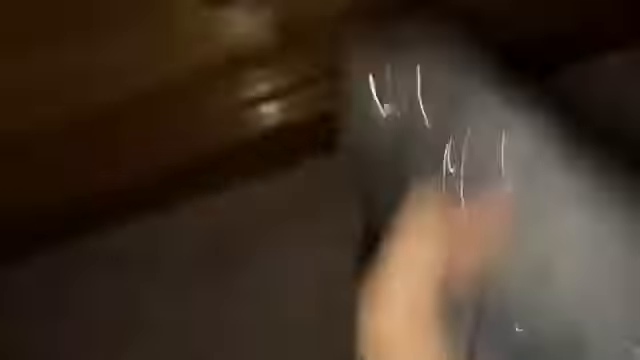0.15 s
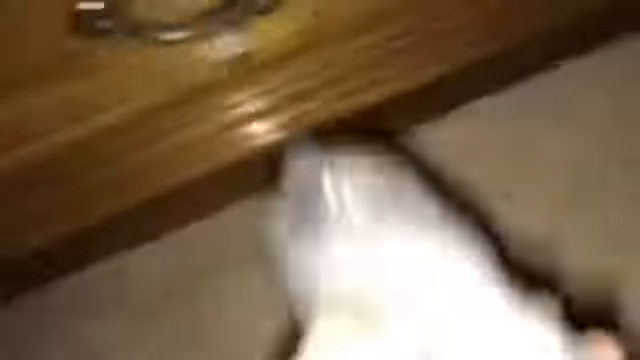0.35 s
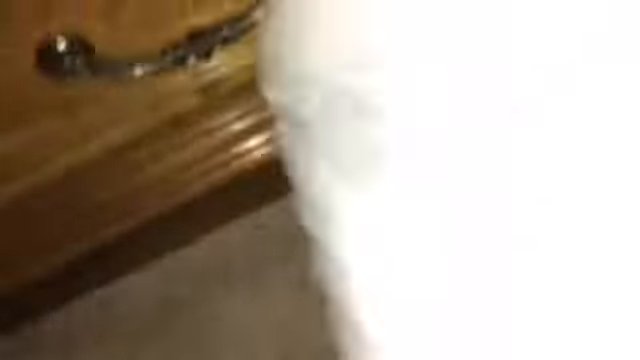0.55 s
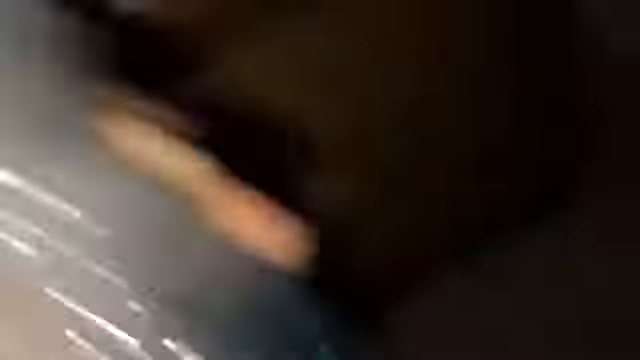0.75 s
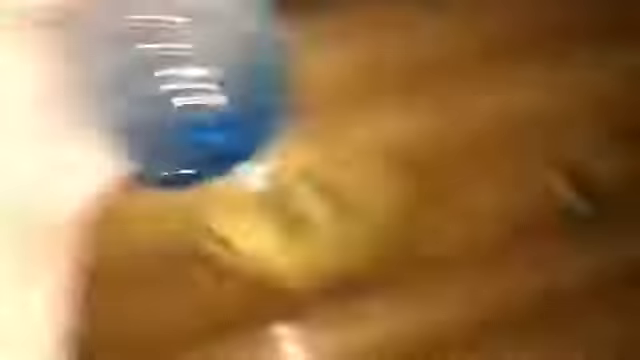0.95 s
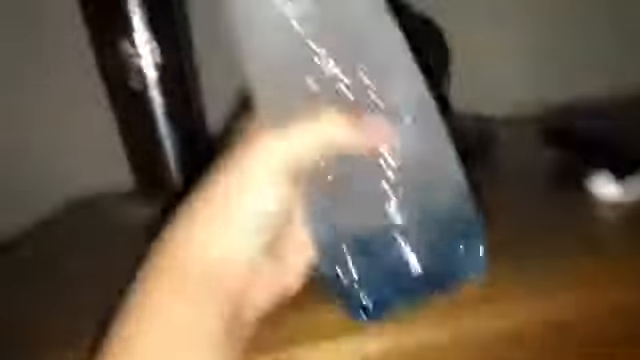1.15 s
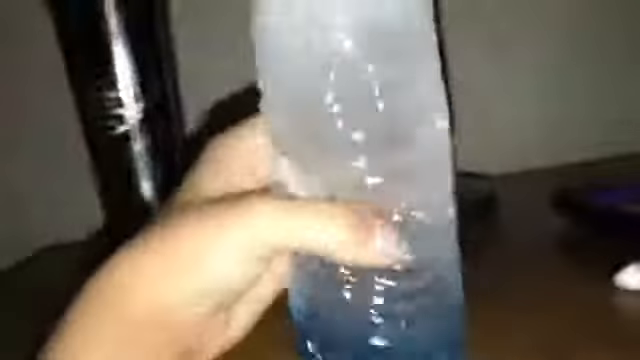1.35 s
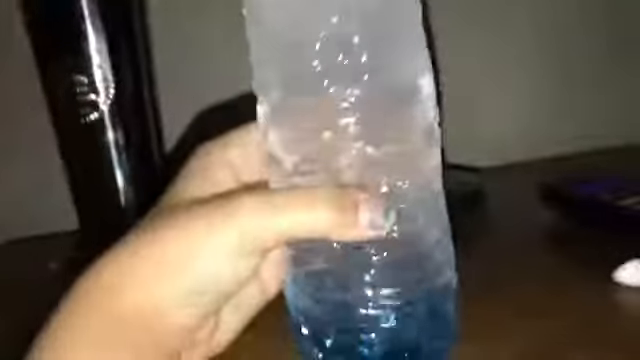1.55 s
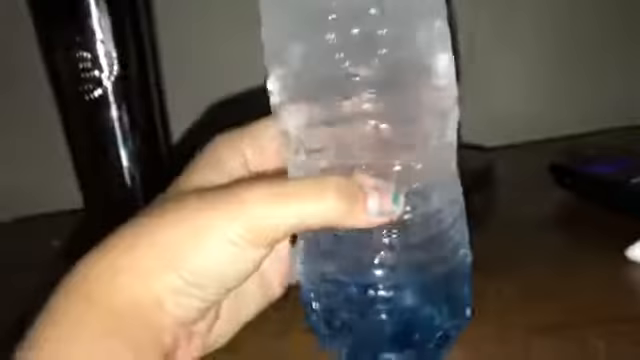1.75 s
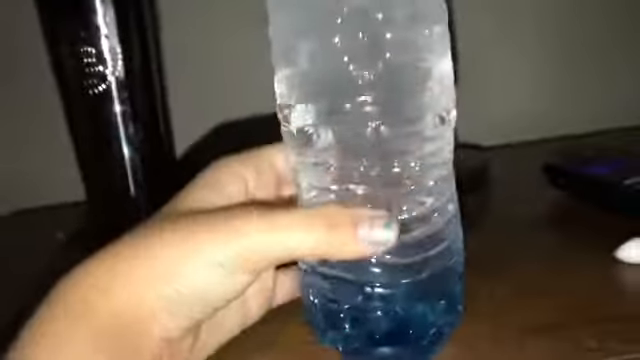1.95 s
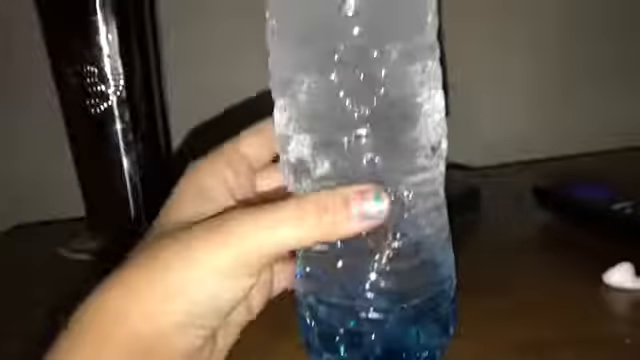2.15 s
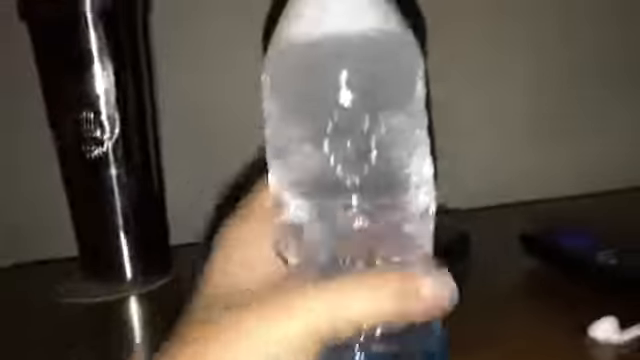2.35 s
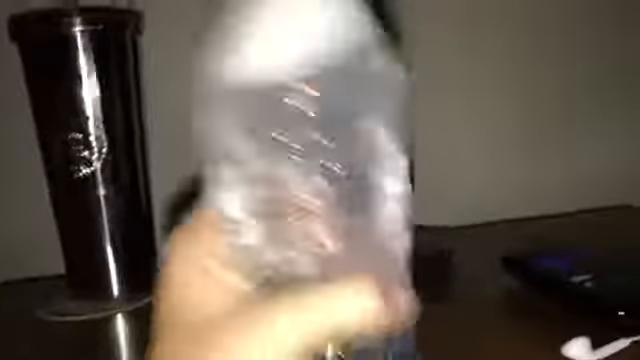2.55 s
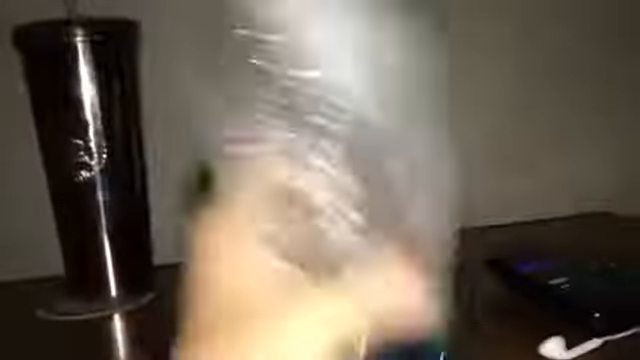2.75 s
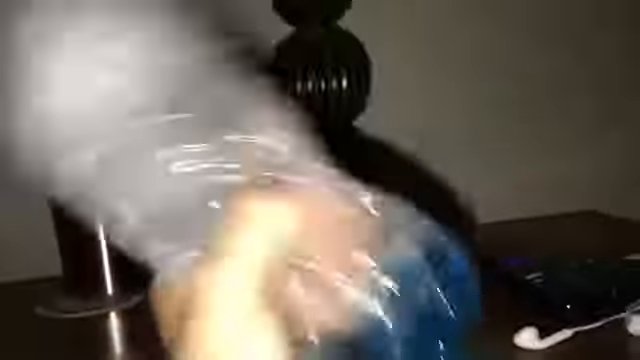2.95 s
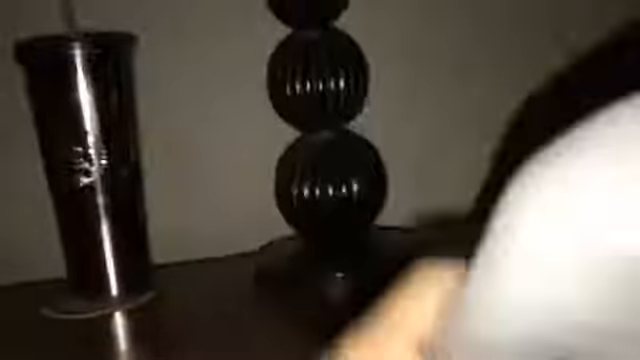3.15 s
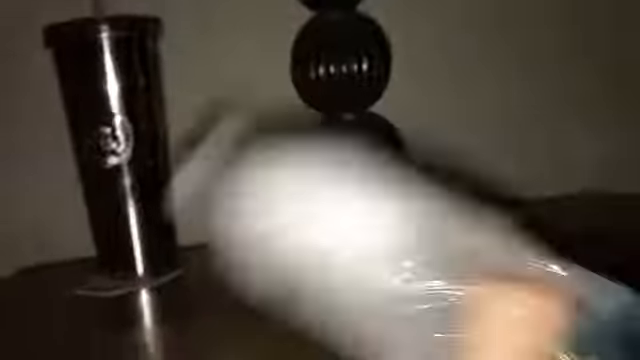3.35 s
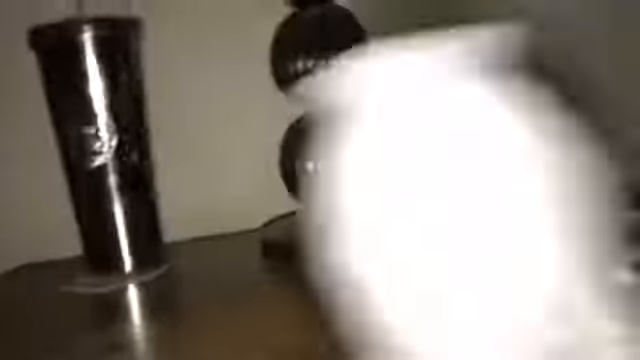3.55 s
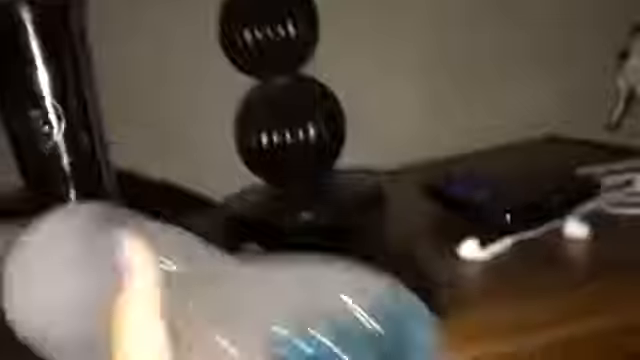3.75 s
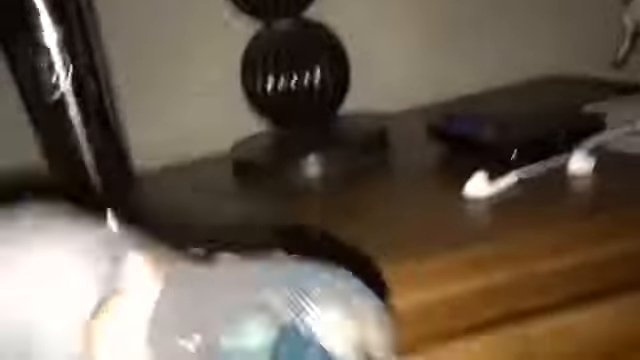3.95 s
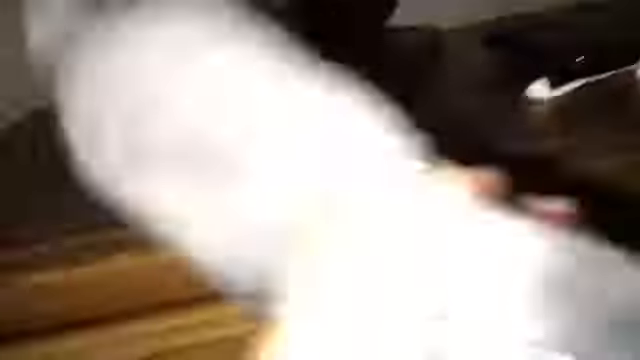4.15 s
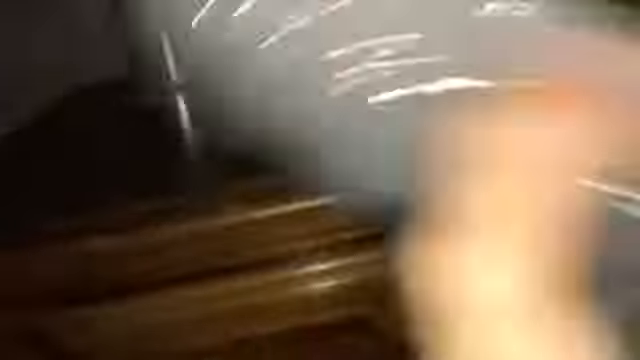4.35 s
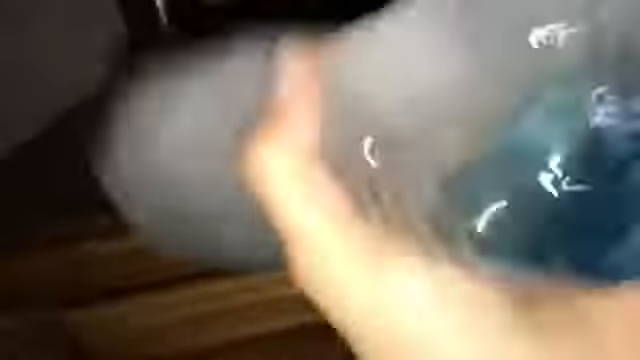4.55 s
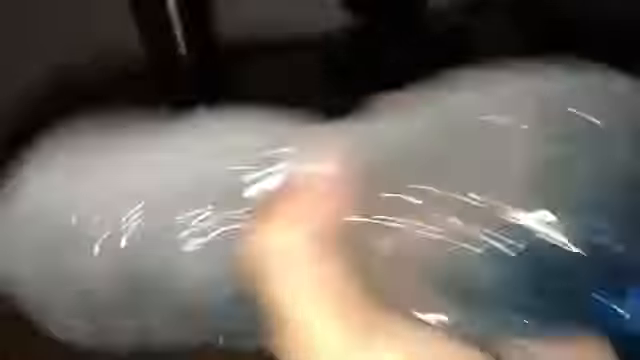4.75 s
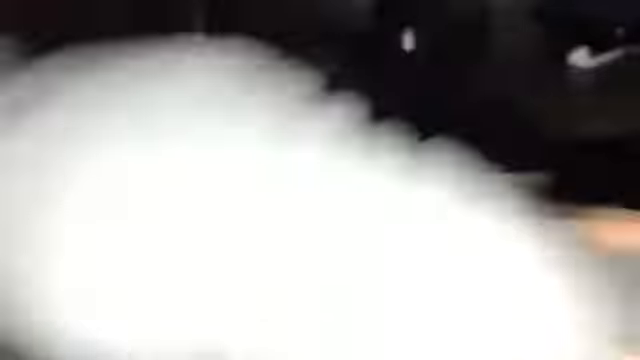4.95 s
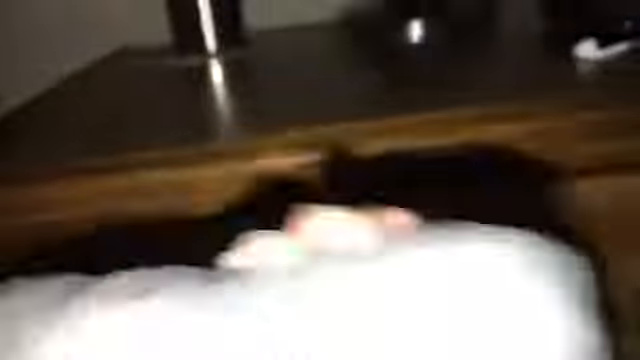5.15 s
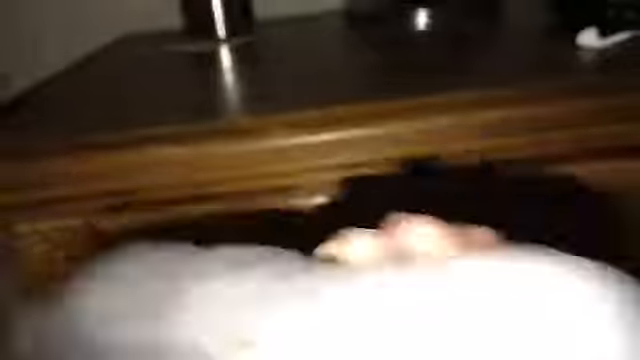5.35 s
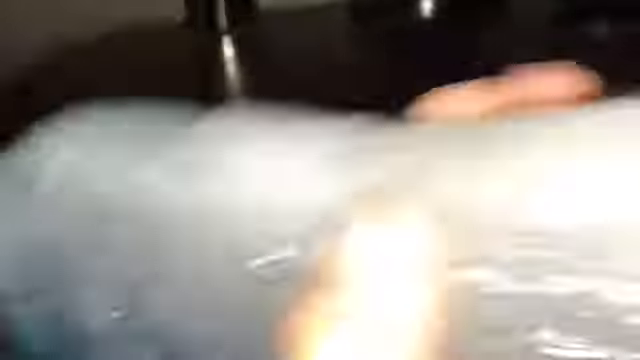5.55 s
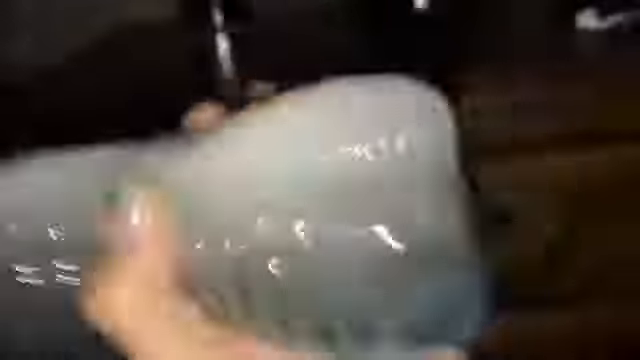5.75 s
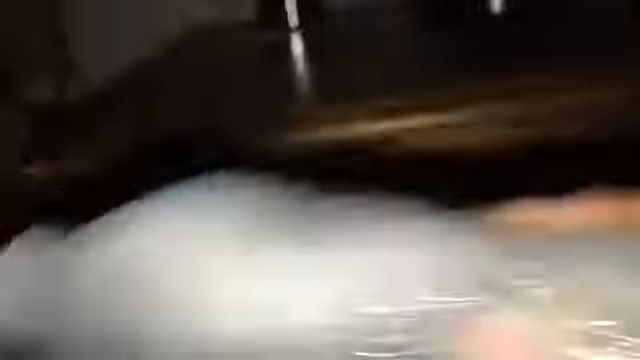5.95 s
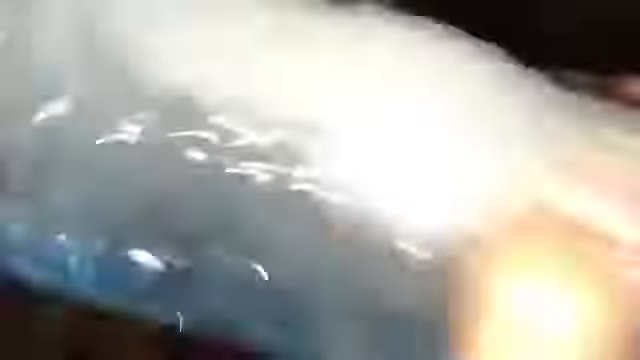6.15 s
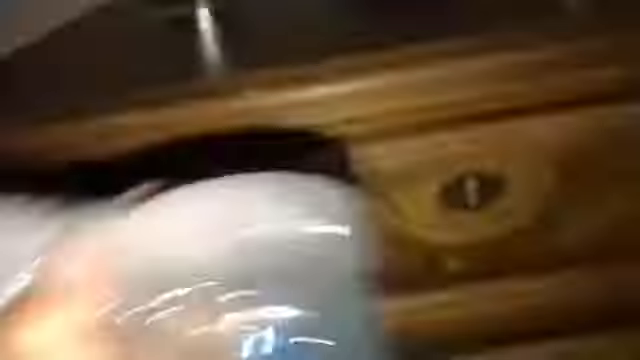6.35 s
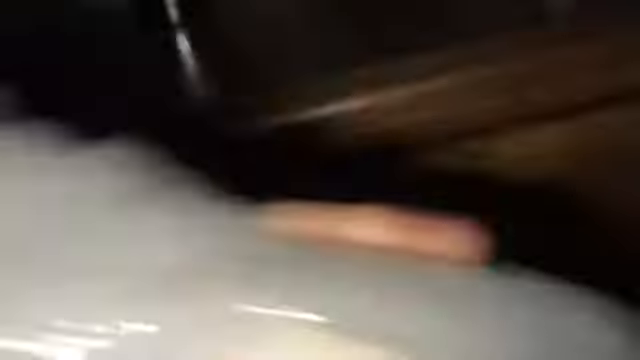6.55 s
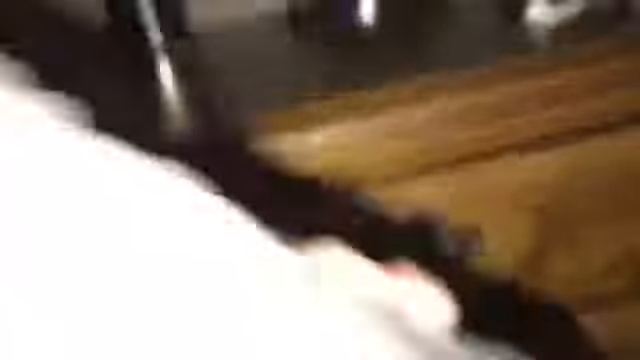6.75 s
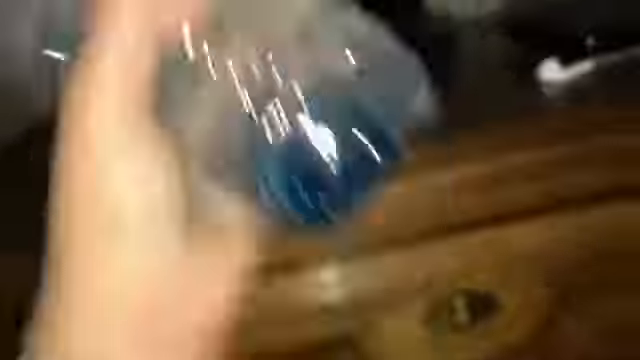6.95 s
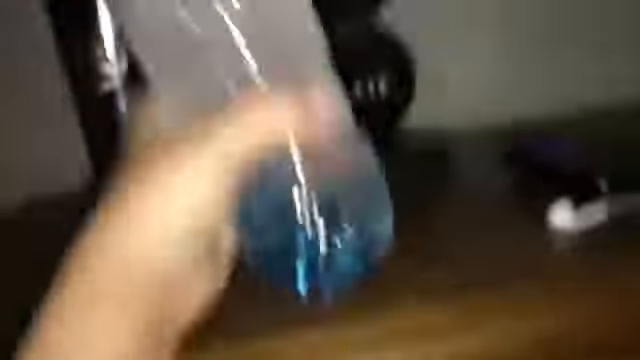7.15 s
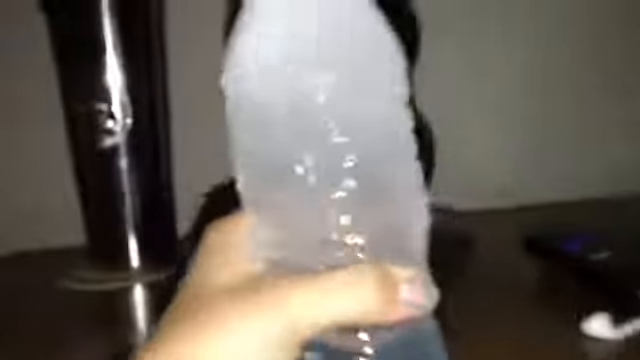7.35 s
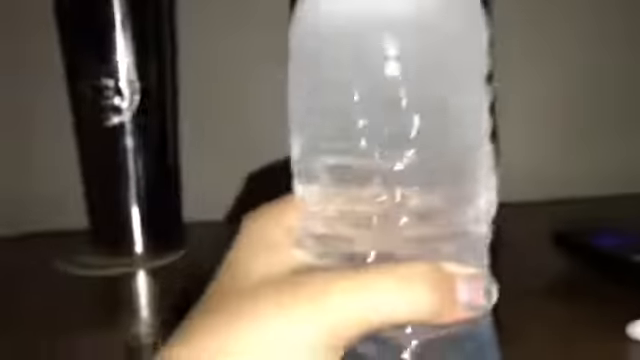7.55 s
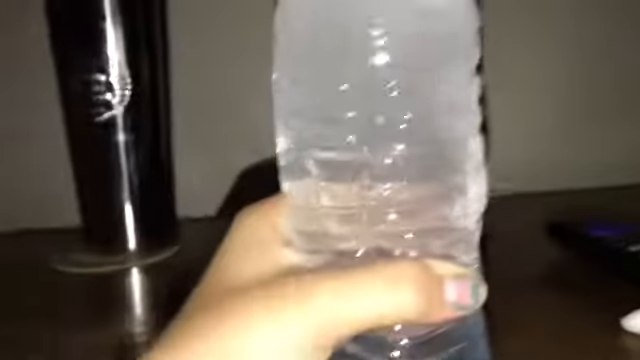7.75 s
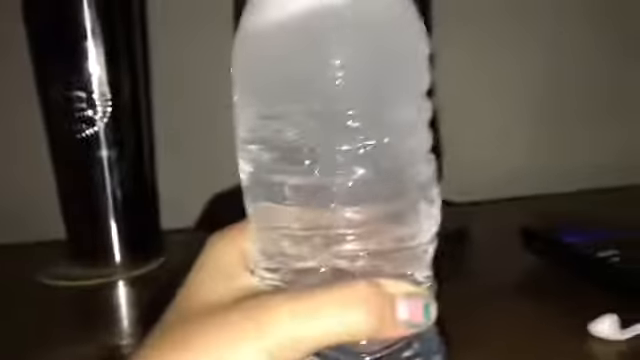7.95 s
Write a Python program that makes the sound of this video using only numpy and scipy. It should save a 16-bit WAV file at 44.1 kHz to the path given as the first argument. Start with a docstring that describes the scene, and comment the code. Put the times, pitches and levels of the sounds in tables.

```python
"""A thin plastic bottle of water and soft beads is shaken and squeezed close to a phone, in two spells.
The wall buckles in sharp snaps (short rings with noisy edges) over a dense crackle of tiny pings.
Beads tick on the wall, water sloshes as a mass of bubbles and slaps the ends, and foam rings the air pocket.
Near reflections surround the bottle; a quiet room hums underneath as shaped noise."""
import sys
import numpy as np
from scipy import signal
from scipy.fft import rfft, irfft, next_fast_len
from scipy.io import wavfile
from scipy.ndimage import uniform_filter1d, map_coordinates

SR = 44100
rng = np.random.default_rng(int(sys.argv[2]) if len(sys.argv) > 2 else 0)


def unload_wav(signal):
    """Save mono or channel-first audio to the path in sys.argv[1] as 16-bit WAV at rate SR, clipped to [-1, 1]."""
    wavfile.write(
        sys.argv[1],
        SR,
        np.round(np.clip(np.atleast_2d(signal).T, -1, 1) * 32767).astype(np.int16),
    )


N = 351918

# Strokes of the hand; levels are before each layer's own trim:
# (start [s], rise [s], fall of the wall sound [s], wall crackle level [dB], bead ticks relative to it [dB],
#  slosh relative to it [dB], centre of the wall's ring [Hz], centre of the bubble pitch [Hz])
HAND_STROKES = [(0, 0.048, 0.128, -26.5, 2.5, -13, 6290, 890),
                (0.2, 0.053, 0.049, -21.5, 1, -16.5, 6870, 1220),
                (0.305, 0.11, 0.072, -25, 4.5, -8.5, 5000, 1210),
                (0.453, 0.063, 0.082, -20.5, -4, -13, 4470, 930),
                (0.614, 0.13, 0.18, -23, -3, -4.5, 3990, 930),
                (0.73, 0.1, 0.25, -18, -8.5, -37.5, 4470, 1510),
                (1.101, 0.0045, 0.21, -22, -3.5, -20, 4650, 920),
                (1.316, 0.0068, 0.021, -37.5, -2, -27, 4820, 640),
                (1.358, 0.1, 0.092, -28, -2, -16.5, 5410, 646),
                (1.47, 0.11, 0.065, -34, 0.5, -15.5, 4720, 500),
                (1.703, 0.011, 0.047, -49, 0.5, 0.5, 4030, 255),
                (1.77, 0.13, 0.173, -52.5, -6.5, 0.5, 4290, 240), (2.22, 0.15, 0.3, -76, 7, -5, 4300, 300),
                (2.453, 0.198, 0.017, -54, -6.5, -10, 4070, 282),
                (2.778, 0.046, 0.05, -32, 6.5, -14.5, 6170, 440),
                (2.844, 0.084, 0.19, -27, 4, -13, 5620, 490),
                (3.103, 0.041, 0.12, -29.5, 9, -14.5, 6600, 427),
                (3.19, 0.083, 0.153, -25.5, 2, -14.5, 6210, 660),
                (3.44, 0.036, 0.033, -23, -4, -28, 4430, 1080),
                (3.47, 0.097, 0.24, -24.5, -1.5, -19.5, 4990, 770),
                (3.764, 0.051, 0.078, -26.5, -0.5, -19.5, 5280, 436),
                (3.875, 0.067, 0.069, -27.5, -0.5, -46.5, 5820, 750),
                (3.95, 0.216, 0.088, -23.5, 0.5, -19, 6120, 970),
                (4.231, 0.028, 0.27, -19, -3, -18.5, 5170, 940),
                (4.422, 0.12, 0.067, -17.5, -8, -21.5, 5050, 900),
                (4.682, 0.12, 0.12, -18.5, -3, -23.5, 4600, 1070),
                (4.892, 0.21, 0.087, -19, -4, -16.5, 4700, 900),
                (5.203, 0.15, 0.083, -19, -1, -13.5, 4310, 1130),
                (5.43, 0.096, 0.14, -21.5, -4.5, -12, 3910, 1020),
                (5.599, 0.034, 0.081, -22, -3, -14.5, 3900, 910),
                (5.713, 0.015, 0.0088, -19.5, -10.5, -14, 5440, 940),
                (5.73, 0.079, 0.034, -25.5, -6, -13, 4400, 890),
                (5.81, 0.11, 0.133, -22, -8.5, -15, 4250, 950), (6.01, 0.13, 0.11, -21, -2, -15, 5110, 795),
                (6.26, 0.1, 0.11, -22.5, -6.5, -17.5, 5010, 700),
                (6.39, 0.12, 0.084, -23, -7.5, -17.5, 5580, 826),
                (6.529, 0.13, 0.3, -21.5, -5, -14.5, 5420, 790),
                (6.75, 0.18, 0.067, -20.5, -3, -15.5, 5090, 920),
                (6.975, 0.027, 0.033, -16.5, -11, -23.5, 4410, 920),
                (7.059, 0.18, 0.15, -28.5, -1, -22.5, 3480, 1190),
                (7.344, 0.0043, 0.074, -20.5, -2.5, -14, 5100, 490),
                (7.37, 0.12, 0.18, -31, 0, -18, 5330, 520)]
REST_DB = -75.5  # wall and water at rest, before the layer's trim


def snaps():
    """A buckle snaps through: a sharp edge, a short ring and a rustle near its pitch as the crease settles."""
    # the clearest wall snaps: (time [s], level [dB], ring pitch [Hz])
    clear_snaps = [(0.0159, -23, 8540), (0.033, -19, 8100), (0.0547, -12.5, 6230), (0.0954, -12.5, 6110),
                   (0.1491, -9, 9150), (0.1813, -18, 6940), (0.2114, -8.5, 6610), (0.2294, -6, 6960),
                   (0.2404, -2, 8630), (0.3257, -17.5, 4630), (0.3384, -17.5, 3290), (0.3501, -20.5, 7190),
                   (0.391, 1.5, 9020), (0.409, -10, 2725), (0.4938, -3, 4430), (0.5015, -7.5, 3540),
                   (0.6559, -16, 5260), (0.6973, -1.5, 3900), (0.7117, -1.5, 5320), (0.8322, -6.5, 3230),
                   (0.9125, -6.5, 4300), (0.9577, -7.5, 6680), (0.9744, -14.5, 4150), (0.9904, -12.5, 4000),
                   (1.0191, -3, 5290), (1.0595, -10, 5650), (1.1089, -7, 3800), (1.1498, -10, 3430),
                   (1.3214, -20.5, 4200), (1.3648, -22.5, 9310), (1.3887, -12.5, 6530), (1.4336, -8, 7930),
                   (1.4491, -14, 5640), (1.5658, -18.5, 3970), (1.5925, -15.5, 8180), (1.6214, -27.5, 7160),
                   (1.71, -33, 3980), (1.7594, -28, 3250), (1.7769, -35.5, 3200), (1.8487, -25.5, 13400),
                   (1.8692, -36.5, 3780), (1.9215, -27, 4220), (1.9485, -18, 8270), (1.9889, -26.5, 10000),
                   (2.0375, -43, 4070), (2.135, -30.5, 4270), (2.1765, -45, 4050), (2.5546, -33, 3460),
                   (2.6095, -27, 3350), (2.6564, -39, 4230), (2.7886, -10, 8870), (2.8125, -10, 12300),
                   (2.8604, -5, 11800), (2.8985, -12.5, 11310), (3.0929, -12, 14700), (3.1173, -7.5, 14400),
                   (3.136, -3.5, 13920), (3.1507, -5, 11900), (3.2306, -15, 6340), (3.256, -10, 6490),
                   (3.314, -11, 12180), (3.4226, -7, 5620), (3.4508, -12.5, 5300), (3.507, -10.5, 5290),
                   (3.5364, -4, 3830), (3.5901, -13, 5540), (3.7743, -16, 5790), (3.8382, -11, 5960),
                   (3.8761, -16.5, 5910), (3.9325, -8.5, 7840), (3.9689, -11, 5430), (4.0167, -9, 6000),
                   (4.0841, -8.5, 6350), (4.1629, -4.5, 5130), (4.1824, -3.5, 6970), (4.2009, -11, 8650),
                   (4.2462, -6.5, 6250), (4.3301, -7, 4010), (4.3487, -7, 6380), (4.4403, -10.5, 4380),
                   (4.4772, -12.5, 4090), (4.4956, -9.5, 4150), (4.5174, -3, 4300), (4.5407, -10, 4510),
                   (4.5895, -3, 4650), (4.6035, -17.5, 3530), (4.6304, -21.5, 6870), (4.6778, -9, 4350),
                   (4.7032, -12.5, 4410), (4.7346, -15.5, 3980), (4.7711, -1, 4370), (4.9117, -10.5, 5540),
                   (4.9377, -7.5, 2910), (4.9836, -14, 4080), (5.035, -13.5, 3140), (5.1123, -12, 3730),
                   (5.1808, -15, 5490), (5.2131, -15, 4430), (5.243, -15, 2310), (5.2599, -12, 3770),
                   (5.2889, 0, 3880), (5.3462, -4, 4350), (5.4091, -9.5, 2680), (5.4515, -6.5, 4120),
                   (5.4829, -4.5, 4300), (5.5258, -3.5, 3840), (5.5553, -3.5, 4260), (5.6276, -12.5, 3380),
                   (5.7189, -4.5, 5250), (5.7783, -7.5, 4290), (5.8047, -9, 3980), (5.8481, -4.5, 4170),
                   (5.9095, -6.5, 4670), (5.9858, -10, 4780), (6.0402, -13, 6150), (6.0536, -1.5, 6540),
                   (6.0881, -4.5, 6520), (6.1679, -8.5, 5570), (6.2736, -9.5, 6500), (6.2896, -8.5, 5310),
                   (6.328, -1.5, 4670), (6.3584, -16.5, 3550), (6.4148, -7.5, 6100), (6.4687, -10.5, 6080),
                   (6.4901, -3.5, 5810), (6.537, -9, 5360), (6.565, -11, 6490), (6.6004, -4, 6380),
                   (6.6648, -0.5, 5310), (6.6947, -4, 5260), (6.7241, 0, 4470), (6.793, -7, 5110),
                   (6.914, -8.5, 6780), (6.992, -7, 2700), (7.0076, -9, 4520), (7.0638, -4, 4810),
                   (7.0933, -10.5, 5810), (7.1287, -10, 4710), (7.1538, -17, 2360), (7.1886, -23.5, 2300),
                   (7.221, -20.5, 2260), (7.2469, -11, 2910), (7.2704, -14.5, 2930), (7.3502, -18, 2180),
                   (7.631, -19.5, 9120), (7.6715, -32, 4700), (7.7019, -24.5, 7250), (7.7603, -29.5, 5910)]
    s, level_db, hz = np.transpose(clear_snaps)

    # further snaps at random moments follow the strength of the strokes
    luck = rng.standard_normal((120, 2))
    stray = rng.uniform(0, N / SR, len(luck))
    stray_level = strength(stray) * amp(8 + 4.5 * luck[:, 0])
    stray_hz = pitch_hz(stray, axis=6) * np.exp(0.3 * luck[:, 1])
    level = np.append(amp(level_db), stray_level)
    s, hz = np.append(s, stray), np.append(hz, stray_hz)

    t = np.arange(1024) / SR
    noise = rng.standard_normal((len(s), 2, len(t)))
    edge_db = -13.5 + 4 * np.log2(hz / 5000)  # higher snaps are sharper
    edge = amp(edge_db[:, None] - 60 * t / 0.011) * np.diff(noise[:, 0], prepend=0)
    flutter = 2.9 * uniform_filter1d(noise[:, 1], size=8, axis=1)
    rustle = amp(-11.5 - 60 * t / 0.017) * flutter * np.sin(2 * np.pi * hz[:, None] * t)
    ring = 1.1 * pings(hz, 15.2, size=1024) + 0.4 * pings(hz * 1.6, 20.5, size=1024)
    return place(s + 0.0007, level[:, None] * (ring + edge + rustle))


def crackle(bursts):
    """Many small creases flip; most ring a patch of wall for a few cycles, some the ribbed panel's own note."""
    # spans in which the grip leaves the ribbed panel free to ring: (start [s], end [s])
    panel_free = [(1.3, 2.75), (4.3, 6.0)]
    s, gain = swarm(count=18000, clumps=2.06 * bursts, spread_db=4.5)
    centre_hz = pitch_hz(s, axis=6)
    scatter = rng.standard_normal(len(s))
    is_free = np.any([(s > a) & (s < b) for a, b in panel_free], axis=0)
    panel = (rng.uniform(size=len(s)) < 0.25) & is_free
    hz = np.where(panel, 4330 * np.exp(0.065 * scatter), centre_hz * np.exp(0.31 * scatter))
    cycles = np.where(panel, 32, 13)[:, None]
    gain = gain * strength(s, rest_db=REST_DB) * amp(-3.5)
    return place(s, gain[:, None] * even(pings(hz, cycles, size=256)))


def beads(bursts):
    """Beads tick on the wall: very short, bright contacts."""
    s, gain = swarm(count=18000, clumps=2.4 * bursts, spread_db=5.0)
    hz = 11000 * np.exp(0.25 * rng.standard_normal(len(s)))
    tick = pings(hz, 8, size=96)
    # the rest level leaves a faint, constant bright hiss under the ticks
    gain = gain * strength(s, axis=4, rest_db=-83.5) * amp(-2.0)
    return place(s, gain[:, None] * even(tick))


def slosh(bursts):
    """Churned water: a dense mass of bubbles that burst within a few cycles, their pitch rising."""
    s, gain = swarm(count=12000, clumps=2.0 * bursts, spread_db=1.5)
    hz = pitch_hz(s, axis=7) * np.exp(0.65 * rng.standard_normal(len(s)))
    bubble = pings(hz, 4.76, size=384, rise=0.4)
    # the water falls away 1.51 times slower than the wall
    gain = gain * strength(s, axis=5, slower=1.51, rest_db=REST_DB) * amp(3.5)
    return place(s, gain[:, None] * even(bubble))


def knocks():
    """Each slap cracks, rings the filled bottle briefly, shakes the water into a dying puff and thuds dully."""
    # water slaps and knocks on the bottle, before the trims below: (time [s], level [dB],
    # thud relative to it [dB], crack relative to it [dB], pitch that the struck spot favours [Hz])
    slaps = [(0.362, -26, -30, -0.5, 900), (0.62, -17.5, -36.5, -17.5, 475), (1.108, -24.5, -23.5, -4, 328),
             (1.45, -28.5, -16, -18, 328), (1.807, -42, -10, -28, 700), (2.555, -38, -18, -9, 700),
             (2.608, -39.5, -30, -9.5, 700), (2.73, -40, -13, -18, 403), (2.878, -25.5, -31, -9, 1000),
             (3.45, -35, -34, 3.5, 1400), (3.507, -27, -34, -5, 1400), (4.102, -6.5, -23.5, -17, 750),
             (4.775, -29, -36, -3, 1010), (4.935, -31, -37.5, 9, 800), (5.232, -26, -30.5, 0, 900),
             (5.265, -23.5, -54.5, -5, 900), (6.325, -24.5, -20, -13, 503), (6.591, -24.5, -30, -6, 850),
             (6.729, -40, -18, -6, 800), (7.348, -37, -2.5, -6, 400)]
    # modes of the filled bottle before scatter and trim: (pitch [Hz], level [dB], t60, capped below [s])
    bottle_modes = [(317, -3.5, 0.28), (470, -2.5, 0.023), (753, -4, 0.037), (1080, 4, 0.021),
                    (1304, -8.5, 0.054), (1700, -17.5, 0.02), (2520, -22, 0.08)]
    s, level_db, thud_db, crack_db, spot_hz = np.transpose(slaps)
    t = np.arange(8192) / SR
    luck = rng.standard_normal((len(s), len(bottle_modes), 2))

    ring = 0
    for k, (hz, mode_db, t60) in enumerate(bottle_modes):
        octaves_off = np.abs(np.log2(hz / spot_hz[:, None]))
        # modes away from the favoured pitch ring weaker
        start_db = mode_db + 4 - 12.5 * octaves_off + 2 * luck[:, [k], 0]
        mode_hz = hz * (1 + 0.043 * luck[:, [k], 1])
        ring = ring + amp(start_db - 60 * t / min(t60, 0.04)) * np.sin(2 * np.pi * mode_hz * t)

    noise = rng.standard_normal((3, len(s), len(t)))
    puff = unit(filtered(noise[0], lambda hz: above(hz, 250) / (1 + (hz / 1100) ** 2)))
    thud = unit(filtered(noise[1], lambda hz: above(hz, 70) ** 2 / (1 + (hz / 260) ** 4)))
    crack = unit(filtered(noise[2], lambda hz: above(hz, 540) / (1 + (hz / 2800) ** 2)))
    water = amp(-3 - 60 * t / 0.11) * puff + amp(thud_db[:, None] + 6.5 - 60 * t / 0.32) * thud
    blow = ring + water + amp(crack_db[:, None] + 12.5 - 60 * t / 0.018) * crack
    onset = 1 - np.exp(-t / 0.00024)
    return place(s + 0.001, amp(level_db - 2.5)[:, None] * blow * onset)


def neck(bursts):
    """Foam bursting under the cap rings the air pocket, whose pitch settles."""
    # air pocket in the upright bottle: (time [s], level before a 1 dB lift [dB], centre pitch [Hz])
    air_pocket = [(7.05, -64, 2500), (7.168, -45, 2420), (7.33, -49.5, 2180), (7.354, -22, 2210),
                  (7.372, -38.5, 2205), (7.66, -57, 2230), (7.76, -85, 2230)]
    s, gain = swarm(count=9000, clumps=1.0 * bursts, spread_db=7.0)
    inside = (s > air_pocket[0][0]) & (s < air_pocket[-1][0])
    s = s[inside]
    gain = gain[inside] * amp(control(air_pocket, s, axis=1) + 1.0)
    hz = control(air_pocket, s, axis=2) * np.exp(0.03 * rng.standard_normal(len(s)))
    return place(s, gain[:, None] * even(pings(hz, 55, size=1024)))


def room(x):
    """Near reflections die faster in the treble; their fine pattern is random, drawn anew every 0.2 s."""
    # decay of the near reflections: (frequency [Hz], t60 [s])
    decay = [(300, 0.086), (3000, 0.06), (12000, 0.031)]
    out, step = np.zeros(N + SR), SR // 5
    for at in range(0, N, step):
        hz, t, z = signal.stft(rng.standard_normal(step), SR, nperseg=128)
        fade = amp(-60 * t / along(decay, hz)[:, None])
        tail = signal.istft(z * fade, SR, nperseg=128)[1]
        answer = signal.fftconvolve(x[at:at + step], tail / np.linalg.norm(tail))
        out[at:at + len(answer)] += answer
    return out[:N]


def hum():
    """Steady room tone: noise shaped by a spectrum, its level wavering a little."""
    # colour of the room tone: (frequency [Hz], relative density [dB])
    tone_colour = [(15, -36), (25, -12.5), (65, -3), (97, -5), (124, -2.5), (142, -13), (167, 1),
                   (214, -10), (288, -3), (445, -11.5), (510, -21), (7920, -33), (12900, -37.5),
                   (15200, -45), (16500, -51.5)]
    tone = unit(filtered(rng.standard_normal(N), lambda hz: amp(along(tone_colour, hz))))
    level_db = -59.0 + 1.1 * wobble(np.arange(N) / SR, 8.8)
    return amp(level_db) * tone


def strokes(s, slower=1):
    """Power of every stroke of the hand at times s, one row each: a swell, a fall, a quick stop."""
    start, rise, fall, db = np.transpose(HAND_STROKES)[:4, :, None]
    swell = np.clip((s - start) / rise, 0, 1) ** 0.63
    since_peak = np.clip(s - start - rise, 0, None) / slower
    fall_db = 17.5 * np.minimum(since_peak / fall, 1)
    stop_db = 327 * np.clip(since_peak - fall, 0, None)  # steep loss once the fall is over
    return (swell * amp(db - fall_db - stop_db)) ** 2


def strength(s, axis=None, slower=1, rest_db=-120):
    """Gain of all strokes together, each offset by the dB in one of its columns, over a level at rest."""
    offset = 1 if axis is None else amp(np.transpose(HAND_STROKES)[axis][:, None]) ** 2
    return np.sqrt(np.sum(strokes(s, slower) * offset, axis=0) + amp(rest_db) ** 2)


def pitch_hz(s, axis):
    """A pitch column averaged over the strokes at times s, weighted by power so the strongest dominates."""
    power = strokes(s) + 1e-12
    return np.transpose(HAND_STROKES)[axis] @ power / power.sum(axis=0)


def jolts(rate, fade):
    """Sudden jolts of the hand and water that die away, as a curve of mean 0 and rms 1."""
    kicks = (rng.uniform(size=N) < rate / SR) * rng.exponential(size=N)
    curve = np.sqrt(signal.lfilter([1], [1, -np.exp(-1 / (fade * SR))], kicks))
    return unit(curve - np.mean(curve))


def swarm(count, clumps, spread_db):
    """Random moments and gains, a few large among many small; grains of energy 1 give a mean power of 1."""
    s = rng.uniform(0, N / SR, count)
    own_db = spread_db * np.minimum(rng.exponential(size=count), 3.5)
    gain = unit(amp(own_db + clumps[(s * SR).astype(int)]))  # clumps is a curve in dB
    return s, gain * np.sqrt(N / count)


def pings(hz, cycles, size, rise=0):
    """Damped sines that lose 60 dB in so many cycles; a positive rise bends the pitch upward."""
    turns = np.clip(hz, 100, 17000)[:, None] * np.arange(size) / SR
    life = turns / np.abs(cycles)
    onset = 1 - np.exp(-turns * 3)
    return amp(-60 * life) * np.sin(2 * np.pi * turns * (1 + rise * life)) * onset


def even(shapes):
    """Every row at energy 1."""
    return shapes / np.linalg.norm(shapes, axis=1, keepdims=True)


def place(s, shapes):
    """Sum of short shapes, one row each, starting at times s."""
    at = np.round(s * SR).astype(int)[:, None] + np.arange(shapes.shape[1])
    return np.bincount(at.ravel(), shapes.ravel(), N + SR)[:N]


def amp(db):
    """Decibels to a linear gain."""
    return 10 ** (np.asarray(db) / 20)


def unit(x):
    """x at rms 1."""
    return x / np.sqrt(np.mean(x ** 2) + 1e-20)


def along(points, hz):
    """(Hz, value) points on a log axis."""
    f, v = np.transpose(points)
    return np.interp(np.log(hz + 1), np.log(f + 1), v)


def control(table, s, axis):
    """One column of a table at times s."""
    return np.interp(s, np.transpose(table)[0], np.transpose(table)[axis])


def wobble(s, rate):
    """A smooth random curve at times s, rate knots a second."""
    return map_coordinates(rng.standard_normal(int(N * rate / SR) + 4), [s * rate])


def filtered(x, response):
    """x with its spectrum multiplied by a response of frequency."""
    m = next_fast_len(x.shape[-1] + 8192)
    return irfft(rfft(x, m) * response(np.fft.rfftfreq(m, 1 / SR)), m)[..., :x.shape[-1]]


def above(hz, edge_hz):
    """A causal second-order high-pass."""
    u = 1j * hz / edge_hz
    return u * u / (1 + 1.107 * u + u * u)


def scene():
    """The bottle in the hand with its near reflections, over the room tone."""
    # colour of hand, table and microphone: (frequency [Hz], gain [dB])
    path_colour = [(100, -5.5), (1000, -5), (2200, -1.5), (3800, -1.5), (4370, -0.5), (4950, -2), (6000, 2),
                   (7600, -1), (9000, 0.5), (10500, -3.5), (11600, 0), (16000, -5)]
    bursts = jolts(rate=70, fade=0.0084)  # per second, s; shared by all grains
    wall = crackle(bursts) + beads(bursts) + snaps()
    wall = filtered(wall, lambda hz: above(hz, 1100) ** 2)  # small patches radiate no bass
    water = filtered(slosh(bursts), lambda hz: above(hz, 160))
    bottle = wall + water + neck(bursts) + knocks()
    near = filtered(bottle + amp(-13.5) * room(bottle), lambda hz: amp(along(path_colour, hz)))
    return (near + hum())[None]


def record(dry):
    """The phone rounds off the highest peaks, cuts the deep bass and keeps nothing above its band limit."""
    soft = dry / (1 + np.abs(dry / 0.95) ** 4) ** (1 / 4)
    return filtered(soft, lambda hz: (hz < 15900) * above(hz, 30) ** 2)


dry = scene()
out = record(dry)
unload_wav(out)
```